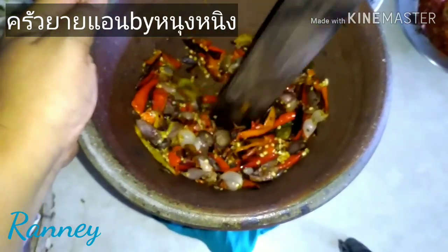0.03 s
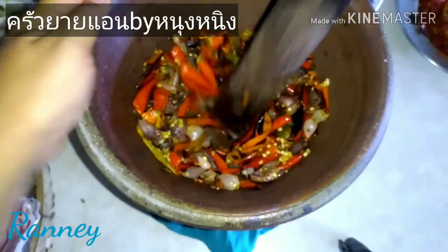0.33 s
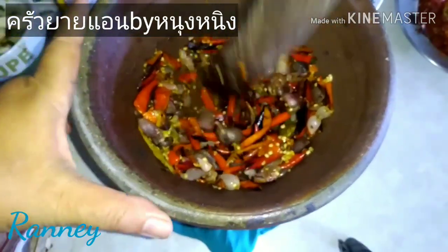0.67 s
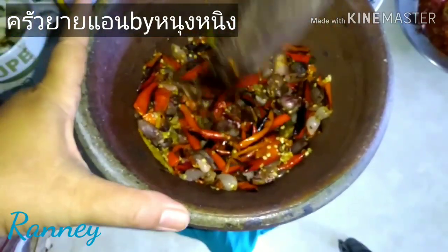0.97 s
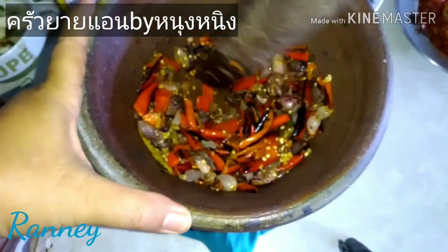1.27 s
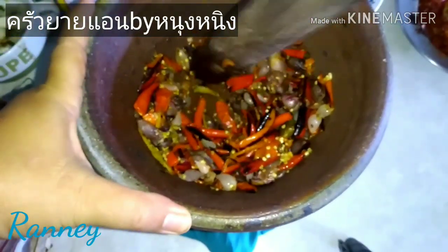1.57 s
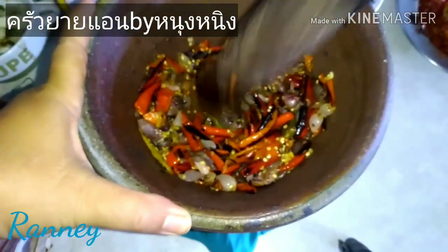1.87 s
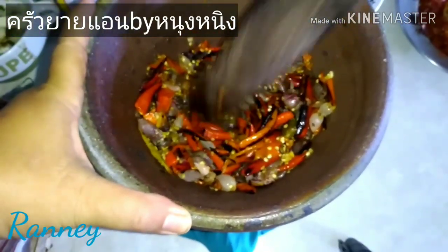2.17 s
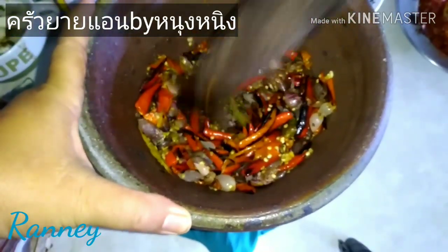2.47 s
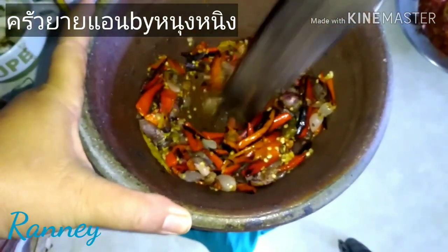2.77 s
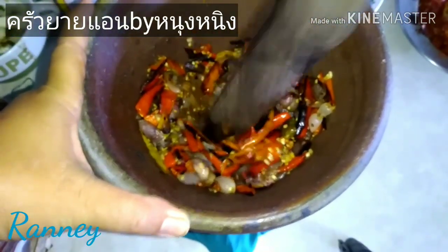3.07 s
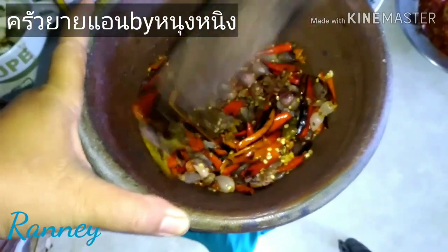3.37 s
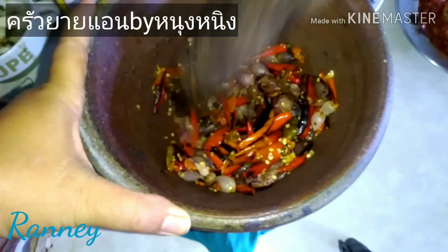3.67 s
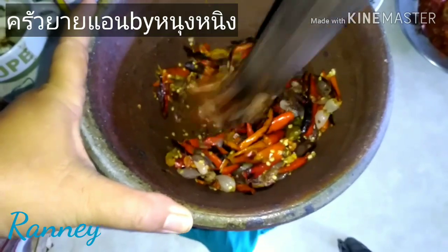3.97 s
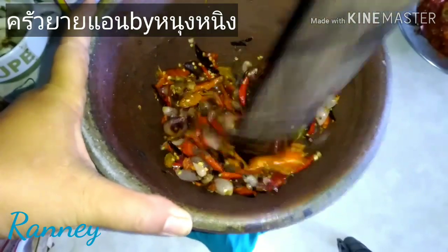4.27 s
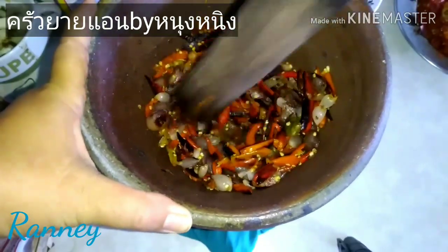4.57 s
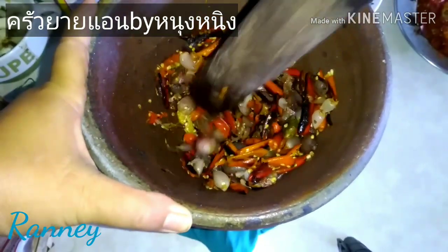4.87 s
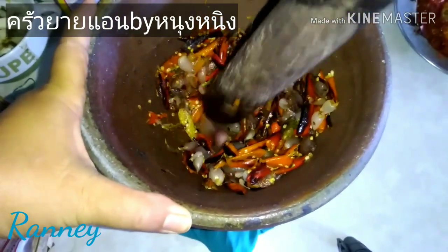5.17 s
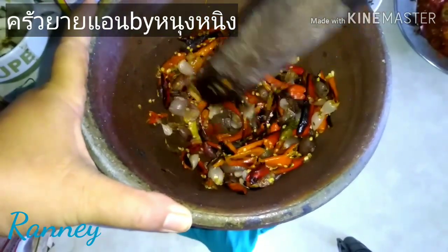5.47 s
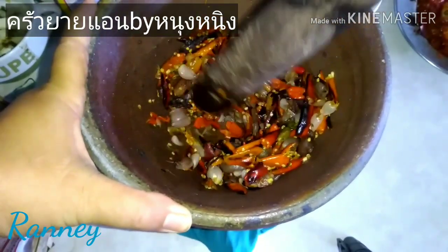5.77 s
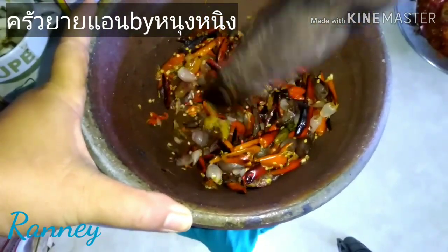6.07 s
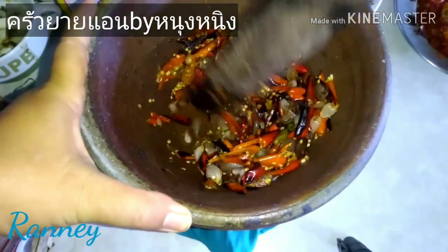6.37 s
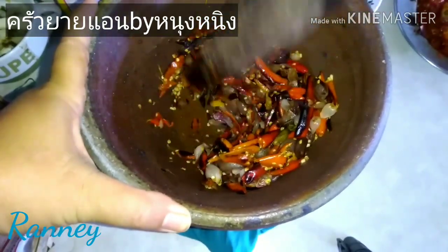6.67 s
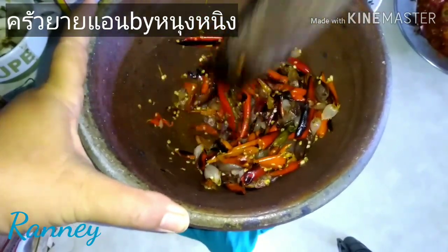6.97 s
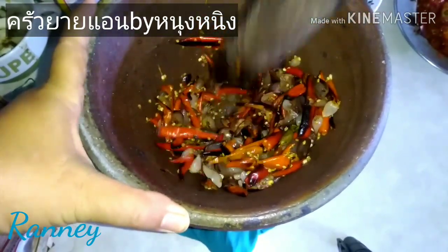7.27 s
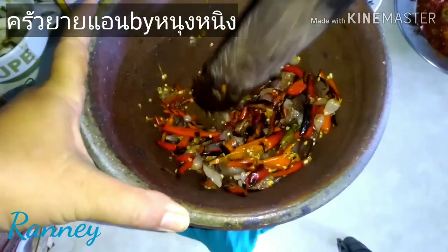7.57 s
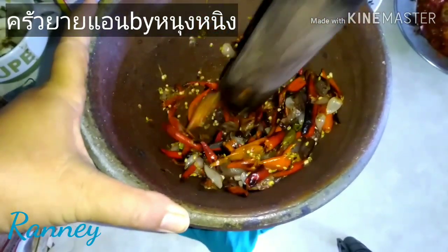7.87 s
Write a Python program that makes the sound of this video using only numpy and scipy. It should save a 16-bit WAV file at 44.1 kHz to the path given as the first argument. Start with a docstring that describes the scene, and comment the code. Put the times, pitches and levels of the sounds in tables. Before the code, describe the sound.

A heavy pestle pounds chilies and shallots in an earthenware mortar at about three strokes a second. Each stroke gives a low thump and a wet crunch, and many add a hollow knock as the pestle reaches the clay. The heavier blows rock the mortar slightly, while skins snap and moist bits patter faintly back. It is heard up close in a small, quiet kitchen.

```python
"""Pounding in a clay mortar

A heavy pestle pounds chilies and shallots in an earthenware mortar, about three strokes a second.
Each stroke crunches as cells fracture in the wet pulp, and thumps the mortar on its support; heavy ones
rock it. Where the pestle gets through, its impact excites the damped modes of the clay wall and bowl.
Bits drop back as the pestle lifts, and a small kitchen reverberates."""
import sys
import numpy as np
from scipy import signal
from scipy.fft import rfft, irfft, next_fast_len
from scipy.io import wavfile
from scipy.ndimage import uniform_filter1d, map_coordinates

SR = 44100
rng = np.random.default_rng(int(sys.argv[2]) if len(sys.argv) > 2 else 0)


def dump_mix(stems):
    """Bounce the given channels to the path in sys.argv[1] as a 16-bit WAV at rate SR."""
    frames = np.atleast_2d(stems).T  # one column per channel
    limited = np.clip(frames, -1, 1)  # hard clip at full scale
    pcm = np.round(limited * 32767).astype(np.int16)
    wavfile.write(sys.argv[1], SR, pcm)


N = 353241
T = np.arange(int(.6 * SR)) / SR  # time axis of one event, t/s

# pestle strokes: (landing t/s, sinking time t/s, crunch level/dB, its swell on the way down level/dB,
# treble fizz level/dB, relative thump level/dB)
STROKES = [(.022, 0.034, -35, -16, -7, -17.5), (.305, 0.042, -33.5, 12, -4.5, -29),
           (0.595, 0.023, -29, -0.5, -2, -27.5), (.889, 0.024, -30.5, 0, -8, -23.5),
           (1.164, 0.024, -31, 12, -5.5, -24), (1.441, 0.011, -28, 6, -9, -18),
           (1.713, 0.012, -28.5, 15, -8, -22.5), (2.014, 0.01, -30, -9, -6.5, -17.5),
           (2.299, 0.0038, -27, -3.5, -5, -18.5), (2.596, 0.01, -27.5, 5.5, -13, -21),
           (2.898, 0.059, -40.5, 21.5, -3.5, -23), (3.182, 0.018, -35.5, -4, -5, -18),
           (3.517, 0.048, -31.5, -0.5, -2.5, -22.5), (3.791, 0.017, -31.5, 7.5, 1, -20),
           (4.097, 0.062, -34.5, 16, -1, -21.5), (4.413, .128, -39.5, 13.5, -2, -26),
           (4.718, 0.017, -26, -1.5, -1.5, -26), (5.038, 0.0074, -28, 2.5, -8, -20.5),
           (5.349, .014, -34.5, -7.5, -3, -23), (5.677, 0.0096, -31, -9, -6, -23.5),
           (5.978, 0.013, -29, -4.5, 1.5, -23), (6.288, .029, -30, 8, -3.5, -22),
           (6.59, 0.024, -33.5, 9, -2, -23.5), (6.886, 0.043, -31.5, -1, 1.5, -24.5),
           (7.213, 0.06, -33, 3.5, -0.5, -28), (7.505, 0.035, -33.5, 14.5, 1, -24.5),
           (7.803, 0.024, -31, -1.5, 0.5, -23)]
# pestle reaching the clay: (onset t/s, skid duration t/s, relative clack level/dB, clack centre f/Hz,
# relative boom level/dB, boom centre f/Hz)
KNOCKS = [(.014, 0.01, -12, 1275, -14.5, 543), (.888, 0.0023, -30.5, 1325, -26, 500),
          (1.444, 0.0056, -15, 1510, -11.5, 555), (1.697, 0.0059, -9, 1230, -15, 570),
          (1.718, 0.0043, -18, 1220, -17.5, 626), (2.016, .006, -15.5, 1290, -12, 567),
          (2.303, 0.0038, -21.5, 1220, -19.5, 445), (2.584, 0.026, -10.5, 1274, -14, 438),
          (2.9, 0.0044, -35.5, 1620, -24.5, 484), (3.17, .013, -10, 1510, -16, 505),
          (3.484, 0.016, -26.5, 1350, -18.5, 537), (3.52, 0.0038, -35, 1265, -19.5, 540),
          (3.778, 0.023, -22, 1210, -15, 598), (4.094, 0.014, -39, 1400, -31, 523),
          (4.403, 0.0018, -9, 1500, -16, 550), (5.039, 0.0034, -20, 1330, -16.5, 556),
          (5.351, 0.0023, -11.5, 1340, -10.5, 517), (5.665, 0.016, -22, 1230, -15, 533),
          (5.963, 0.013, -22.5, 1390, -15.5, 494), (6.266, 0.03, -26.5, 1310, -17.5, 540),
          (6.556, .029, -10.5, 1280, -16, 500), (6.868, 0.029, -28.5, 1300, -16.5, 534),
          (7.206, 0.0053, -37.5, 1380, -32.5, 545), (7.48, 0.0054, -51, 1370, -25.5, 540),
          (7.506, .012, -26.5, 1280, -14.5, 495)]
# spectrum of fracturing pulp and seeds: (f/Hz, relative density level/dB)
PULP_SPECTRUM = [(150, -29.5), (400, -2.5), (560, 4.5), (880, -17), (1350, 4.5), (1700, -0.5), (2100, -2.5),
                 (2500, -0.5), (3000, 2.5), (3600, -3), (4500, -2.5), (6000, -3), (10000, -7),
                 (15500, -10.5)]


def amp(db):
    """Amplitude ratio of a level in decibels."""
    return np.exp(np.asarray(db) * (np.log(10) / 20))


def unit(x):
    """Normalisation to rms 1."""
    return x / np.sqrt(np.mean(x ** 2) + 1e-20)


def along(points, hz):
    """Interpolation of (f/Hz, value) points on a logarithmic frequency axis."""
    f, v = np.transpose(points)
    return np.interp(np.log(hz + 1), np.log(f + 1), v)


def add(track, s, sound):
    """Superposition of a sound on the track at time s."""
    i = round(s * SR)
    sound = sound[max(-i, 0):]
    part = track[max(i, 0):][:len(sound)]
    part += sound[:len(part)]


def filtered(x, response):
    """Linear filtering: the spectrum of x times a frequency response."""
    m = next_fast_len(len(x) + 8192)
    return irfft(rfft(x, m) * response(np.fft.rfftfreq(m, 1 / SR)), m)[:len(x)]


def noise(spectrum, size):
    """Gaussian noise with the given spectral shape, rms 1."""
    return unit(filtered(rng.standard_normal(size), lambda hz: amp(along(spectrum, hz))))


def snaps(size, per_s, spread_db):
    """Shot noise: randomly timed impulses whose levels scatter by spread_db, rms 1."""
    sizes = amp(spread_db * np.minimum(rng.exponential(size=size), 4))
    return unit((rng.random(size) < per_s / SR) * sizes * rng.choice([-1, 1], size))


def wobble(rate):
    """Random modulation: a smooth curve over one event, rate knots a second."""
    coarse = T[::16]
    return np.interp(T, coarse, map_coordinates(rng.standard_normal(512), [coarse * rate], mode="wrap"))


def ripple(hz, per_octave=3):
    """Spectral irregularity: a random curve over log frequency."""
    return np.interp(np.log2(hz + 100) * per_octave, np.arange(128), rng.standard_normal(128))


def fade(t60, hold=0):
    """Exponential decay, 60 dB in t60 seconds, after a steady hold."""
    return np.exp(-np.log(1000) * np.maximum(T - hold, 0) / t60)


def rise(attack):
    """First-order onset with time constant attack."""
    return 1 - np.exp(-T / attack)


def swell(t, start, stop, attack, release):
    """Exponential growth up to start and decay after stop, 60 dB in attack and release seconds."""
    return amp(-60 * (np.maximum(start - t, 0) / attack + np.maximum(t - stop, 0) / release))


def room_hush():
    """Ambient noise: a faint, steady floor, mostly bass."""
    # spectrum of the quiet room: (f/Hz, relative density level/dB)
    spectrum = [(25, 1), (100, 25), (350, -17), (700, -36.5), (3000, -15.5), (15000, -54)]
    return amp(-71.5) * noise(spectrum, N)


def in_kitchen(x, wet_db):
    """Reverberation: the direct sound plus a diffuse field that decays at its own rate in each band."""
    # reverberation of the kitchen: (f/Hz, 60 dB decay t/s)
    decay_times = [(100, 0.17), (500, 0.39), (1500, 0.46), (4000, 0.53), (8000, 0.42), (15000, 0.49)]
    hz, t, bands = signal.stft(rng.standard_normal(len(T)), SR, nperseg=256)
    decay = amp(-60 * t / along(decay_times, hz)[:, None])
    tail = signal.istft(bands * decay, SR, nperseg=256)[1][:len(T)] * rise(0.01)
    return x + amp(wet_db) * signal.fftconvolve(x, tail / np.linalg.norm(tail))[:len(x)]


def drops():
    """Inelastic impact: wet bits patter back onto the clay as the pestle lifts."""
    # bits landing: (t/s)
    landings = [0.0793, 0.672, 4.8415, 5.4282, 5.7489, 6.101, 6.721, 6.9995, 7.6404]
    # spectrum of a wet splat: (f/Hz, relative density level/dB)
    spectrum = [(300, -2), (550, 1.5), (900, -17.5), (1300, -1), (1750, -6.5), (2500, -9.5), (3500, -15),
                (7000, -28.5), (15000, -45)]
    out = np.zeros(N)
    for s in landings:
        splat = noise(spectrum, len(T)) * amp(0.7 * wobble(490)) * fade(0.082) * rise(0.00052)
        add(out, s - .002, in_kitchen(amp(-37.5) * splat, wet_db=-5.5))
    return out


def grinding():
    """Friction noise: the pestle twists over seeds and grit with a force that swells and eases off."""
    # twists after a blow: (greatest force t/s, level/dB)
    twists = [(1.497, -35), (1.784, -31.5)]
    t = np.arange(N) / SR
    force = sum(amp(db) * swell(t, s, s, attack=0.096, release=0.23) for s, db in twists)
    grit = filtered(snaps(N, per_s=2900, spread_db=2.0), lambda hz: amp(along(PULP_SPECTRUM, hz)))
    return in_kitchen(force * unit(grit), wet_db=-6.5)


def cracks(half_width_octaves=0.4):
    """Fracture under tension: a taut chili skin or shallot layer splits in one short, bright burst."""
    # the loudest skins splitting: (t/s, relative peak level/dB, centre f/Hz)
    splits = [(0.2897, -11, 4600), (0.5756, -18, 3890), (.863, -19, 2870), (1.157, -5, 2920),
              (1.422, -17.5, 4300), (2.3052, -11, 2560), (2.874, -12, 9990), (2.888, -10, 2660),
              (3.4665, -8.5, 4170), (4.0444, -13, 4290), (4.0911, -4, 3410), (4.6987, -18, 3000),
              (5.03, -27, 4400), (6.258, -17.5, 3440), (6.849, -1.5, 7680)]
    out = np.zeros(N)
    for s, db, centre_hz in splits:
        tear = snaps(len(T), per_s=3600, spread_db=3.5) * fade(0.02)
        crack = filtered(tear, lambda hz: 1 / (1 + (np.log2((hz + 1) / centre_hz) / half_width_octaves) ** 2))
        add(out, s, in_kitchen(amp(db - 6.5) * crack / np.abs(crack).max(), wet_db=-22.0))
    return out


def crunch(juice_gain=.42, clump_db=4.0, colour_db=3.0):
    """Acoustic emission: crushed skins and cells burst in clumps over a hiss of squeezed juice."""
    out, early = np.zeros(N), .06
    fizz_share = [(3000, 0.022), (10000, 0.97)]  # (f/Hz, fraction of the fizz level)
    for landing, sinking, db, swell_db, fizz_db, _ in STROKES:
        start, stop = landing - sinking, landing + 0.0068  # the pestle presses on after it lands
        t = T - early + start
        pressure_db = db + swell_db * np.interp(t, [start, stop], [-.5, .5])
        pulp = np.zeros(len(T))
        for piece in range(3):  # each piece has its own colour and gives way at its own moments
            cells = snaps(len(T), per_s=3300, spread_db=4.5)
            juice = juice_gain * rng.standard_normal(len(T))
            bursts = (cells + juice) * amp(clump_db * wobble(300))
            pulp += filtered(bursts, lambda hz: amp(
                along(PULP_SPECTRUM, hz) + fizz_db * along(fizz_share, hz) + colour_db * ripple(hz)))
        stroke = unit(pulp) * amp(pressure_db) * swell(t, start, stop, attack=0.033, release=0.043)
        add(out, start - early, in_kitchen(stroke, wet_db=-13.0))
    return out


def shudder(t60, uneven_db=3):
    """Damped random vibration: the support shakes, unevenly at first, while the mortar settles."""
    # spectrum of the shaking support: (f/Hz, relative density level/dB)
    spectrum = [(25, -17.5), (55, -8), (100, 10), (175, 0.5), (250, -3), (320, -0.5), (430, -8),
                (600, -22.5), (900, -22), (2000, -25), (6000, -42)]
    jolts = amp(uneven_db * wobble(45) * fade(t60))
    return jolts * noise(spectrum, len(T)) * rise(0.0017) * fade(t60)


def rocking(interval_s=0.04, loss_db=4.5):
    """Repeated lossy impact: the tipped mortar bumps down in three weakening taps on its support."""
    # heavy strokes that tip the mortar: (first bump t/s, relative level/dB)
    tips = [(1.207, -16), (1.495, -12.5), (1.764, -10), (2.082, -18), (3.244, -18.5)]
    # spectrum of the mortar's foot tapping: (f/Hz, relative density level/dB)
    spectrum = [(60, -32.5), (170, -11.5), (310, 2.5), (430, -4), (650, -11.5), (2000, -43.5)]
    out = np.zeros(N)
    for s, db in tips:
        add(out, s - interval_s, amp(db - 12) * shudder(t60=0.76))
        for k in range(3):
            tap = noise(spectrum, len(T)) * fade(0.084) * rise(0.0031)
            add(out, s + k * interval_s, in_kitchen(amp(db - 6 - k * loss_db) * tap, wet_db=-9))
    return out


def pushes():
    """Force transmission: packed pulp loads the mortar, so a low rumble starts just before each knock."""
    # spectrum of the rumble: (f/Hz, relative density level/dB)
    spectrum = [(25, -18.5), (55, 5.5), (95, 16.5), (150, 4.5), (280, -13), (450, -32), (1200, -47.5)]
    out, early = np.zeros(N), .08
    force = swell(T - early, start=-.008, stop=0.011, attack=0.024, release=0.037)
    for s, _, _, _, boom_db, _ in KNOCKS:
        add(out, s - early, amp(boom_db - 17.5) * force * noise(spectrum, len(T)))
    return out


def thumps():
    """Mass-spring resonance: each landing bounces the mortar on its support and leaves it shuddering."""
    # modes of the mortar on its support: (f/Hz, relative level/dB, 60 dB decay t/s)
    modes = [(64, -28, 0.058), (97.75, -1, 0.18), (139.6, -9.5, 0.18), (171.3, -10.5, 0.3)]
    out = np.zeros(N)
    for landing, *_, db in STROKES:
        detune = 1 + .03 * rng.standard_normal()
        bounce = sum(amp(level + rng.normal(0, 3.05)) * np.sin(2 * np.pi * hz * detune * T) * fade(t60)
                     for hz, level, t60 in modes)
        add(out, landing - .006, amp(db + 6.5) * bounce * rise(0.0035))
        add(out, landing, amp(db - 9.5) * shudder(t60=0.67))
    return out


def lingering_tones(clack_db, boom_db):
    """Light damping: a few tones outlast the blow, the low fed by the boom, the high by the clack."""
    # slowly decaying modes: (f/Hz, relative level/dB, 60 dB decay t/s)
    modes = [(430, 6, 0.36), (550.5, 18.5, 0.13), (551, 8.5, 0.38), (1284, -12.5, 0.41), (1307, -14.5, .5),
             (1854, -17, 0.33)]
    drive = [(700, boom_db - 21.5), (1100, clack_db - 15.5)]
    tones = np.zeros(len(T))
    for hz, db, t60 in modes:
        envelope = amp(db + along(drive, hz) + rng.normal(0, 2.5)) * fade(t60)
        tones += envelope * np.sin(2 * np.pi * (hz * T + rng.random()) + .55 * wobble(31))
    return tones


def bowl_boom(centre_hz, skid, focus_db=14):
    """Driven resonance: the skid sustains the bowl's modes; the contact point favours some over others."""
    # low modes of the bowl: (f/Hz, relative level/dB, 60 dB decay t/s)
    modes = [(329, -6.5, 0.11), (438.6, -1, 0.066), (529.7, 1, .036), (592.4, -3.5, 0.013),
             (710, -7, 0.063)]
    gains = np.array([amp(db - focus_db * abs(np.log2(hz / centre_hz))) for hz, db, _ in modes])
    rings = [amp(3.0 * wobble(150)) * np.sin(2 * np.pi * hz * T + 1.08 * wobble(84)) * fade(t60, skid)
             for hz, _, t60 in modes]
    return gains @ np.array(rings) / np.linalg.norm(gains)


def wall_ring(centre_hz, focus_db=10):
    """Impulse response of the wall, peak 1: the blow's place and hardness favour modes near centre_hz."""
    # modes of the clay wall and pestle: (f/Hz, relative level/dB, 60 dB decay t/s)
    modes = [(1236, 7, 0.026), (1515, 6.5, 0.013), (1690, -8.5, 0.041), (1872, -2, 0.017),
             (2220, -8.5, .012), (2680, -18, 0.087), (3108, -6.5, 0.02)]
    ring = np.zeros(len(T))
    for k, (hz, db, t60) in enumerate(modes):
        level = db + rng.normal(0, 0.6) - focus_db * min(abs(np.log2(hz / centre_hz)), .5)
        ring += (-1) ** k * amp(level) * np.sin(2 * np.pi * hz * T) * fade(t60)
    return ring / np.abs(ring).max()


def knocks(typical_skid_s=0.011, db_per_doubling=3.5):
    """Impact and stick-slip: the pestle clacks and skids; longer skids chatter and ring on more."""
    # spectrum of the dense after-ring: (f/Hz, relative density level/dB)
    after_spectrum = [(300, -4), (430, -6), (560, 3), (720, -5.5), (1000, -6), (1300, -6.5), (1520, -8.5),
                      (1800, -11), (2300, -24), (3100, -29), (6000, -42.5)]
    out = np.zeros(N)
    for s, skid, clack_db, clack_hz, boom_db, boom_hz in KNOCKS:
        skid_db = db_per_doubling * np.log2(skid / typical_skid_s)
        wall = amp(4) * wall_ring(clack_hz)
        shattering_seeds = amp(-17.5) * noise(PULP_SPECTRUM, len(T)) * fade(0.011)
        clack = amp(clack_db) * (wall + shattering_seeds)
        slips = snaps(len(T), per_s=610, spread_db=0.0)
        slip_ring = signal.fftconvolve(slips, wall_ring(2950))[:len(T)]  # hard slips favour upper modes
        chatter = amp(skid_db - 18) * unit(slip_ring) * rise(.004) * fade(0.025, hold=skid + 0.0022)
        boom = amp(4) * bowl_boom(boom_hz, skid) * rise(0.00024 + .02 * skid)  # glancing blows build slowly
        contact = clack + amp(boom_db) * (boom + chatter)
        after_ring = amp(clack_db - 14.5) * noise(after_spectrum, len(T)) * fade(0.45)
        after_ring += lingering_tones(clack_db, boom_db)
        add(out, s, in_kitchen(contact, wet_db=-16) + amp(skid_db) * after_ring * rise(0.0019))
    return out


def scene():
    """Superposition of pulp, mortar and the quiet of the room, in one channel."""
    pulp = crunch() + cracks() + grinding() + drops()
    mortar = pushes() + thumps() + knocks() + rocking()
    return (pulp + mortar + room_hush())[None]


def suppress(x, threshold_db=-97, bass_db=20, min_gain=.2):
    """Spectral gating: each band is turned down as it sinks towards a threshold, higher in the bass."""
    hz, _, bands = signal.stft(x, SR, nperseg=512)
    power = uniform_filter1d(np.abs(bands) ** 2, size=3, axis=0)
    power = np.abs(uniform_filter1d(power, size=3, axis=1))
    threshold = amp(threshold_db + bass_db * along([(300, 1), (3000, 0.78), (15000, 0)], hz)) ** 2
    gain = np.maximum(power / (power + threshold[:, None]), min_gain)
    return signal.istft(bands * gain, SR, nperseg=512)[1][:N]


def record(dry, low_hz=36, top_hz=15600):
    """Gating, soft saturation and band limiting: quiet noise sinks and the highest peaks are rounded."""
    highpass = signal.butter(2, low_hz, "highpass", fs=SR, output="sos")
    x = signal.sosfilt(highpass, suppress(dry[0]))
    rounded = x / (1 + np.abs(x) ** 6) ** (1 / 6)
    return filtered(rounded, lambda hz: 1 / (1 + (hz / top_hz) ** 120))[None]


dry = scene()
out = record(dry)
dump_mix(out)
```